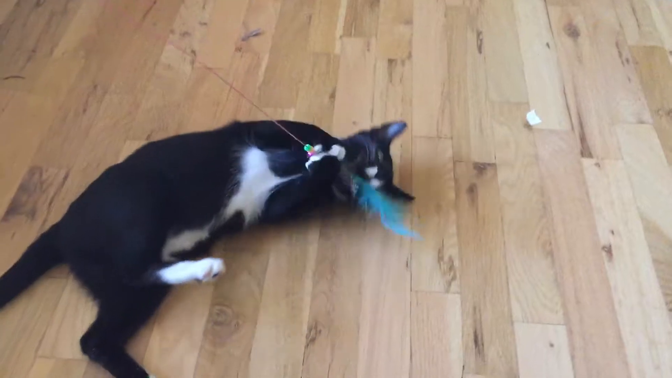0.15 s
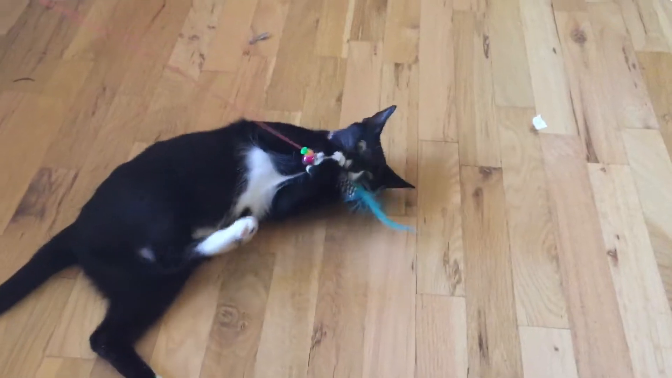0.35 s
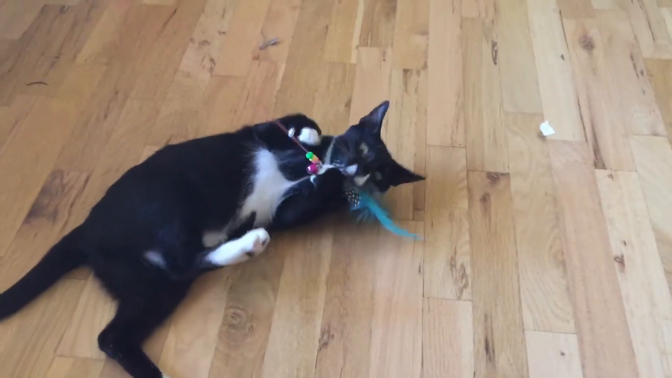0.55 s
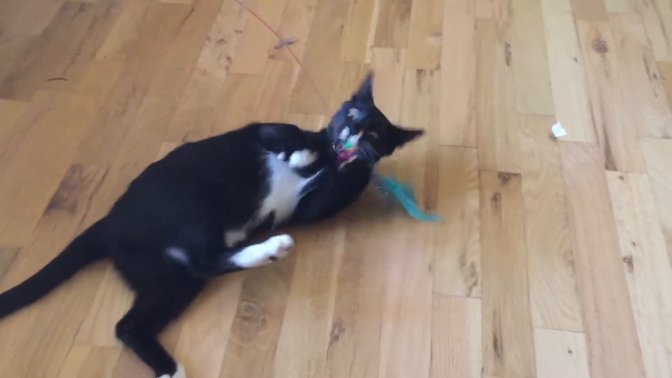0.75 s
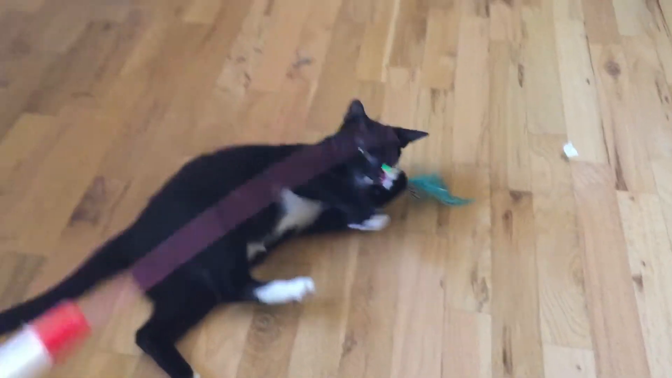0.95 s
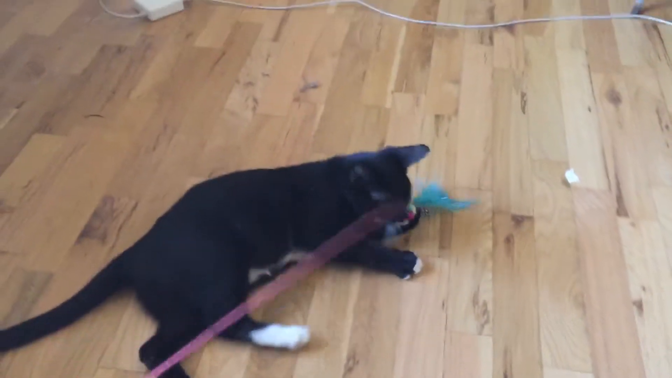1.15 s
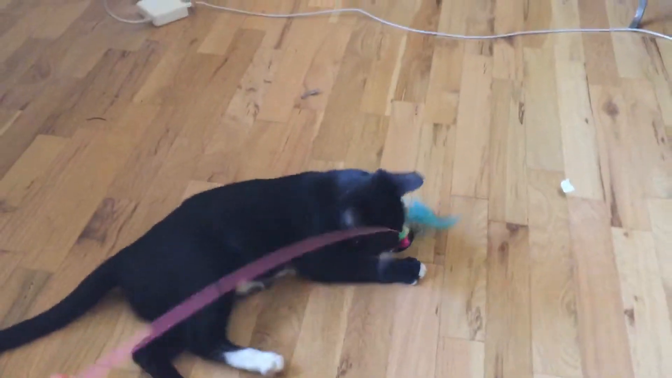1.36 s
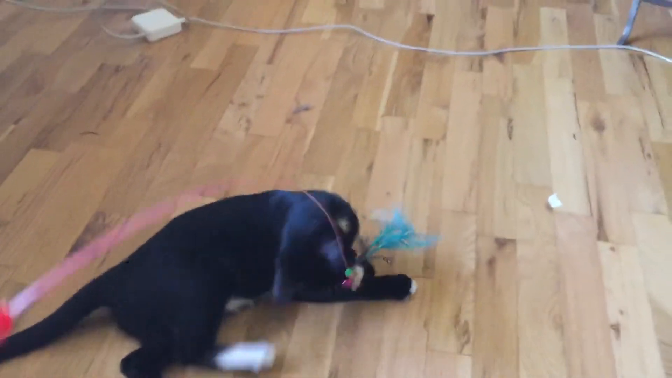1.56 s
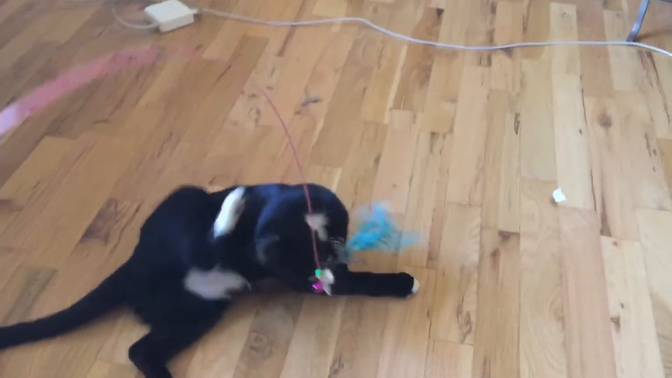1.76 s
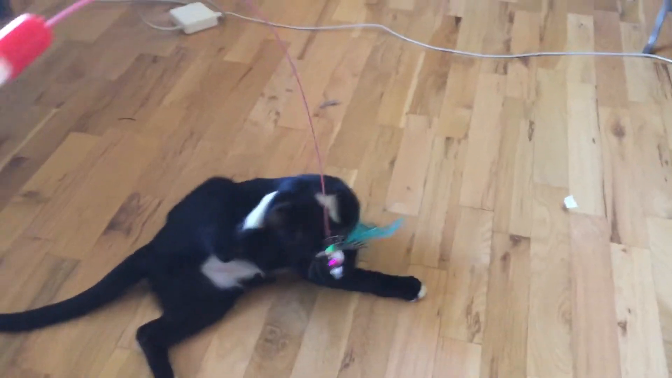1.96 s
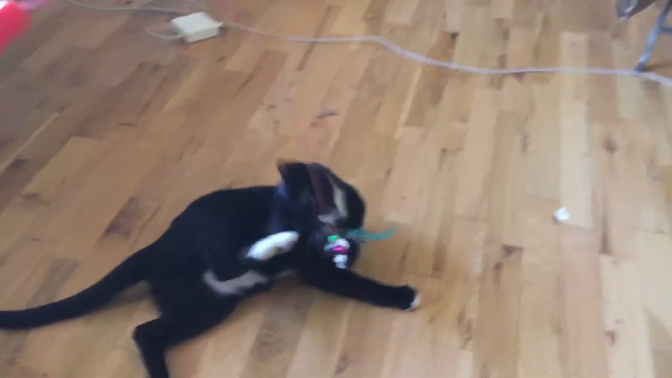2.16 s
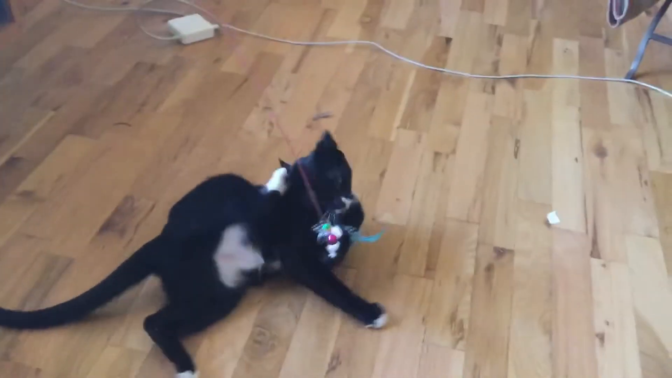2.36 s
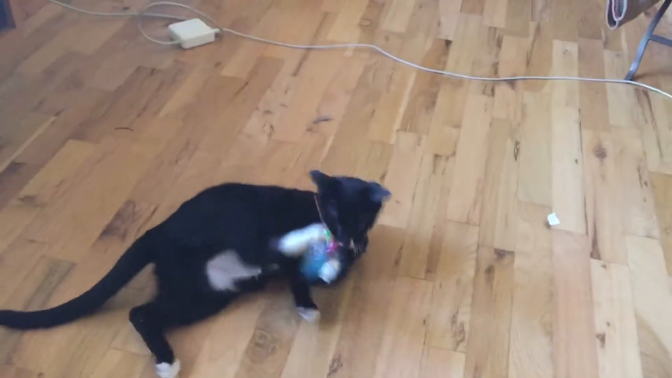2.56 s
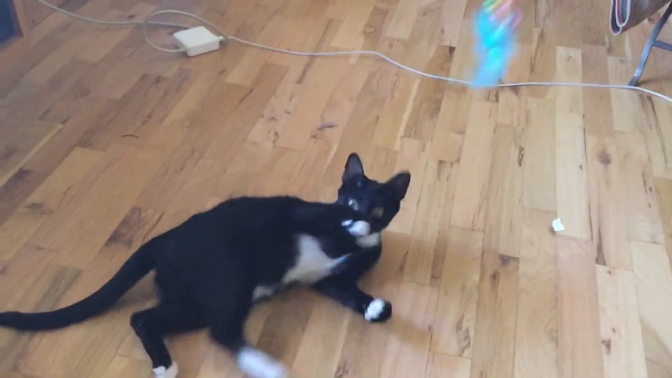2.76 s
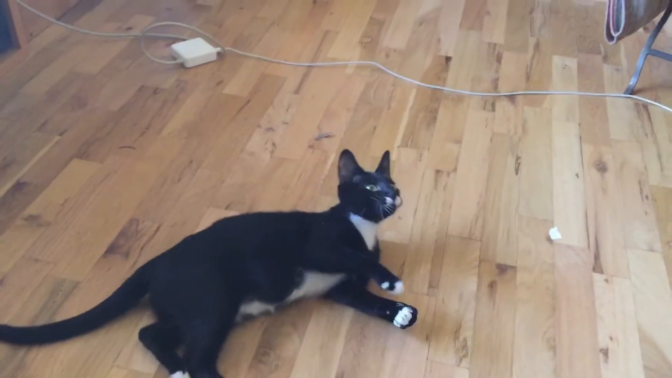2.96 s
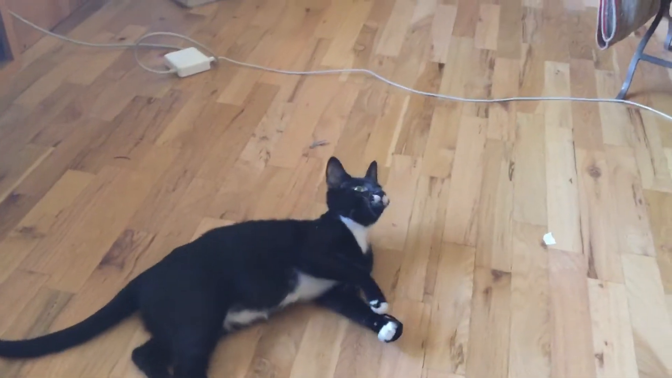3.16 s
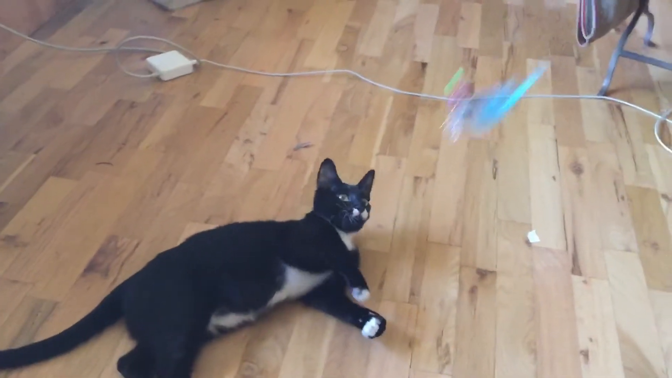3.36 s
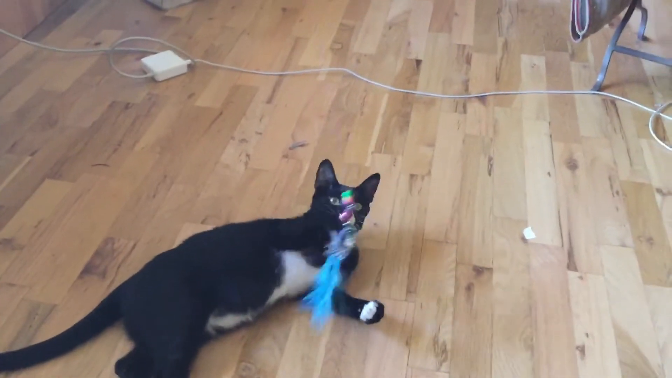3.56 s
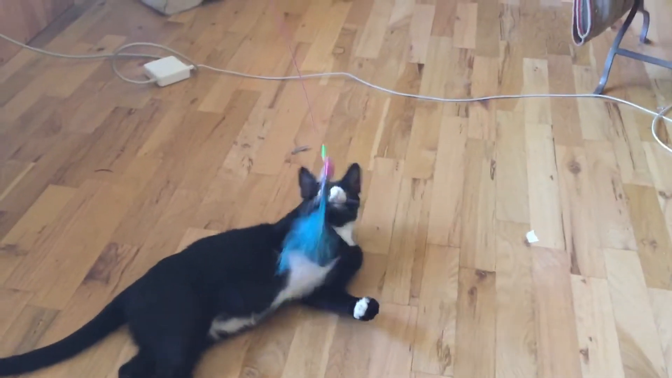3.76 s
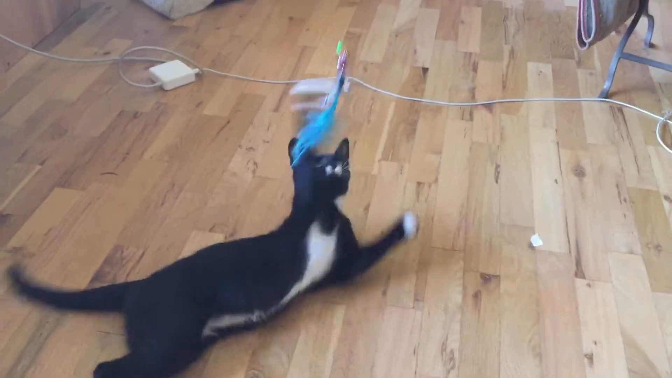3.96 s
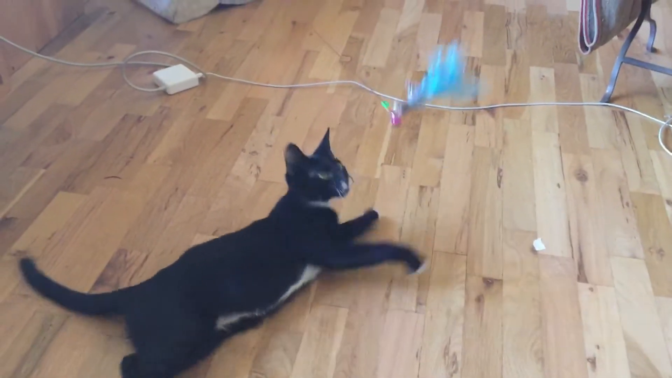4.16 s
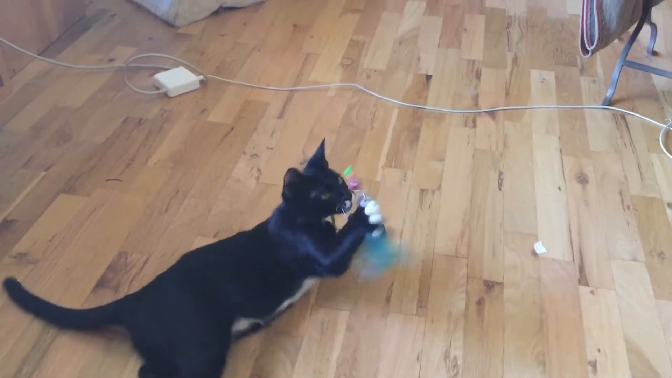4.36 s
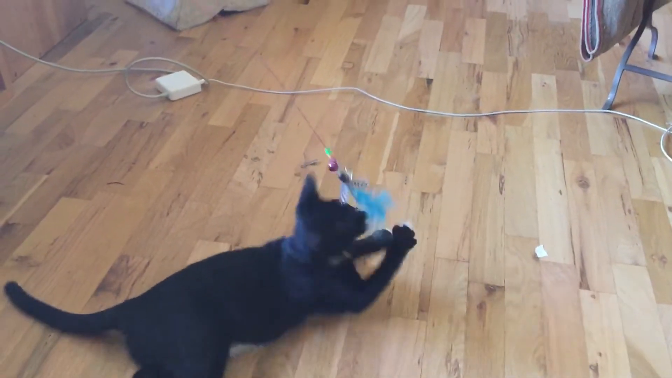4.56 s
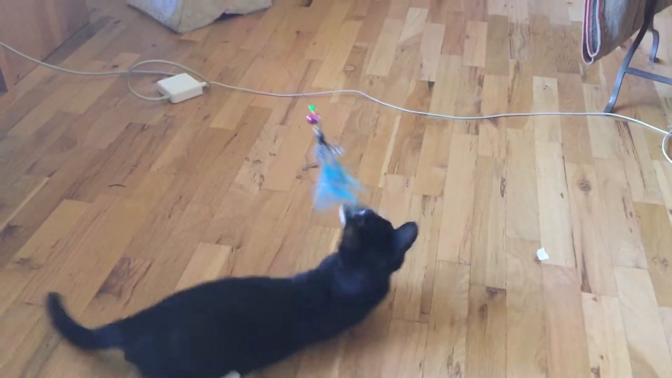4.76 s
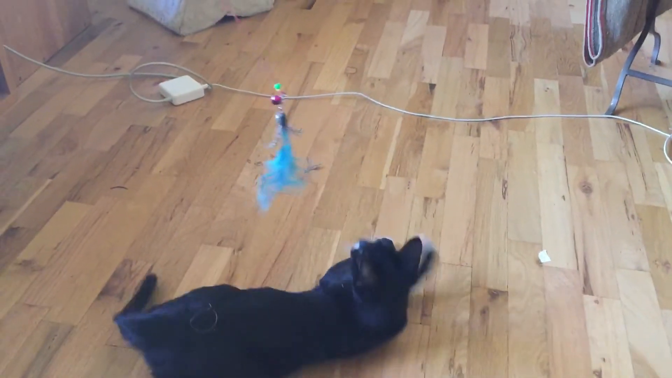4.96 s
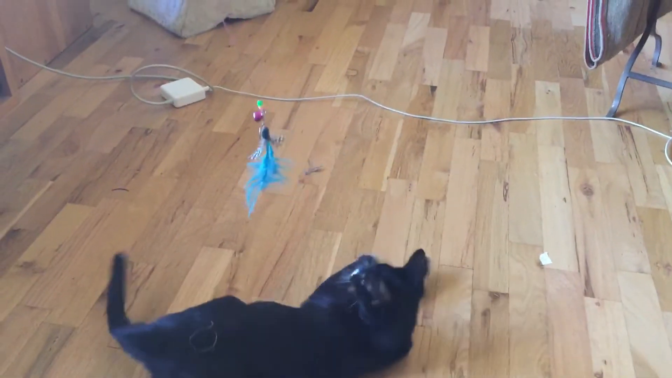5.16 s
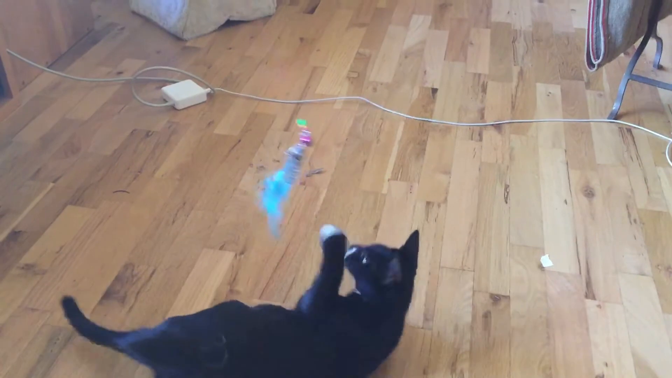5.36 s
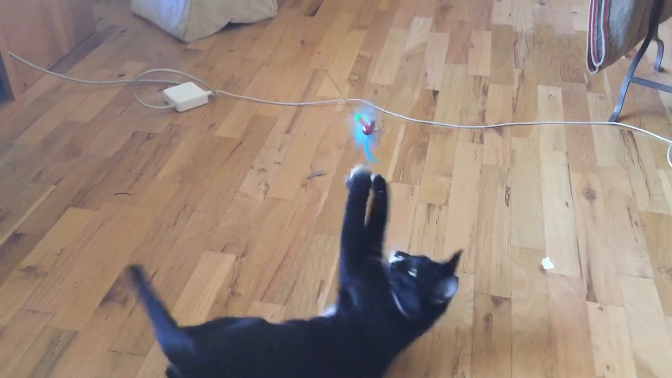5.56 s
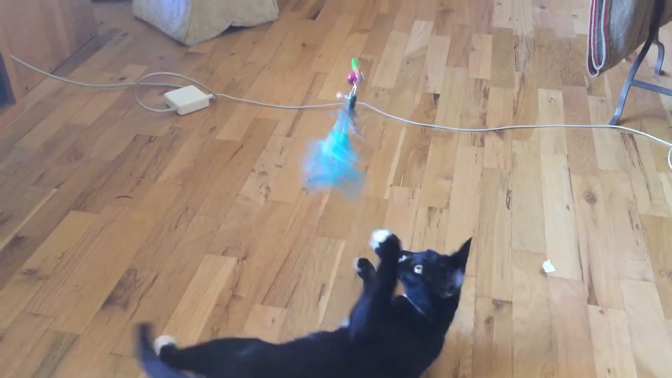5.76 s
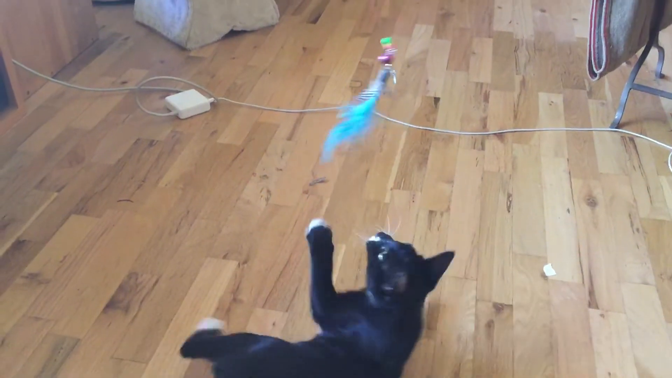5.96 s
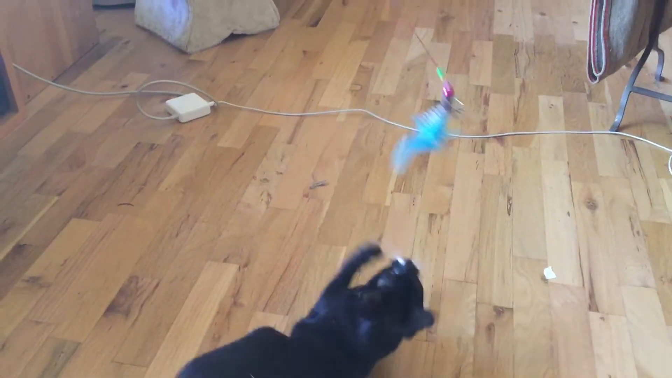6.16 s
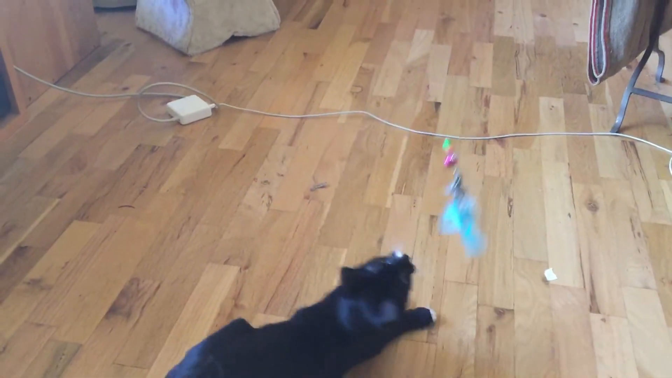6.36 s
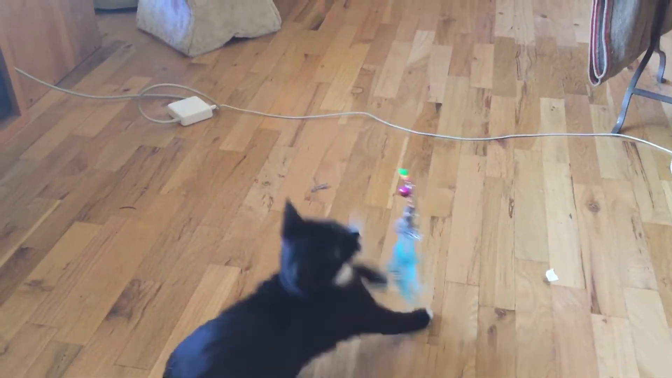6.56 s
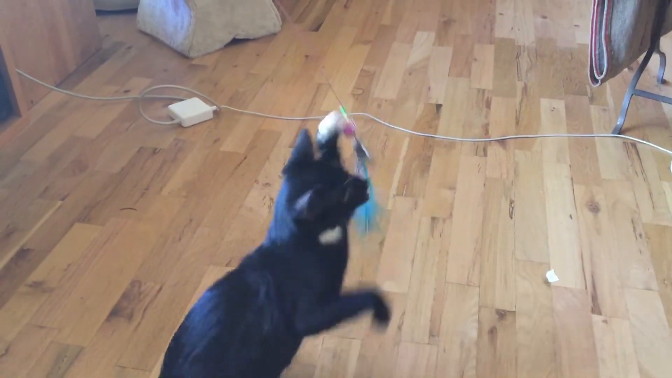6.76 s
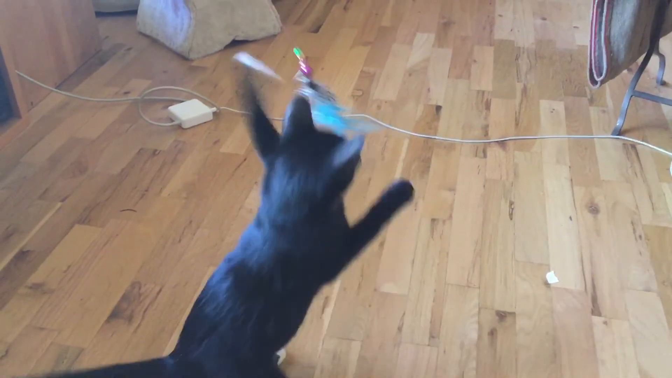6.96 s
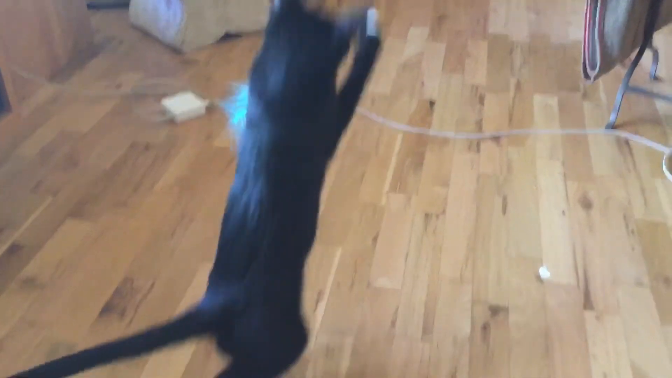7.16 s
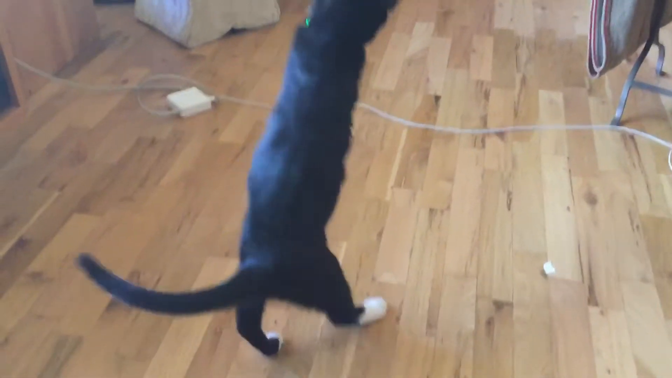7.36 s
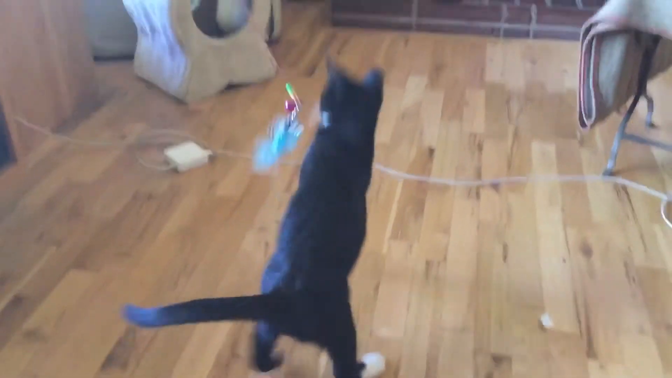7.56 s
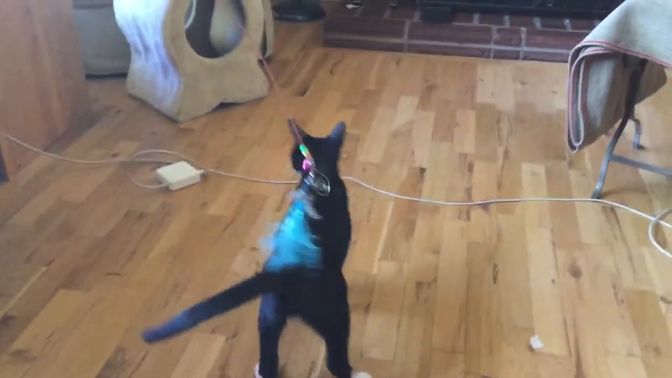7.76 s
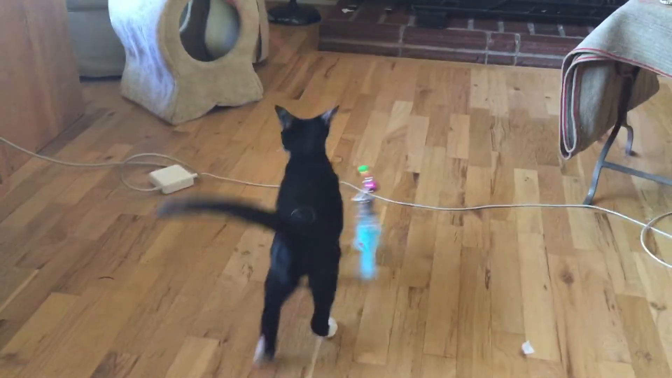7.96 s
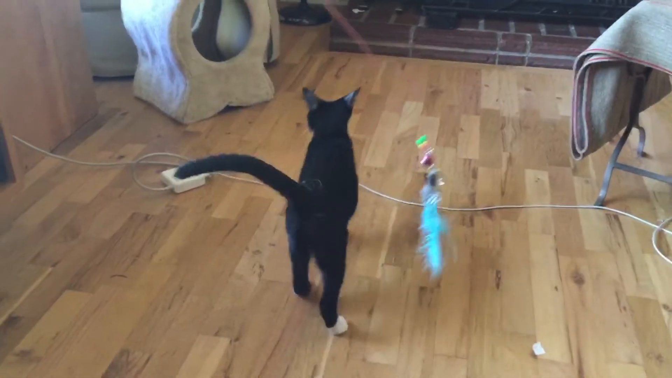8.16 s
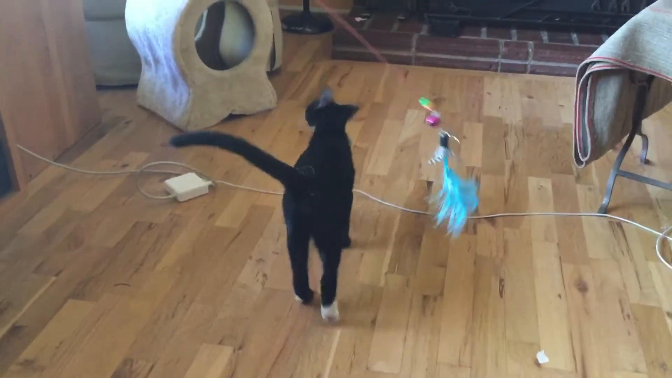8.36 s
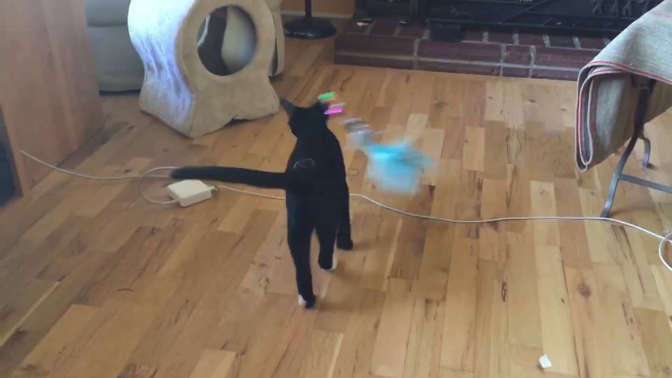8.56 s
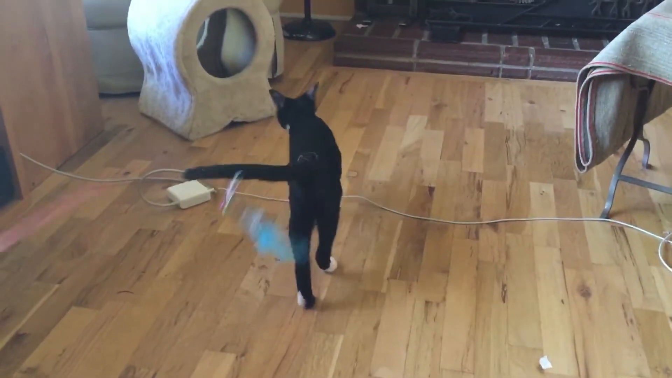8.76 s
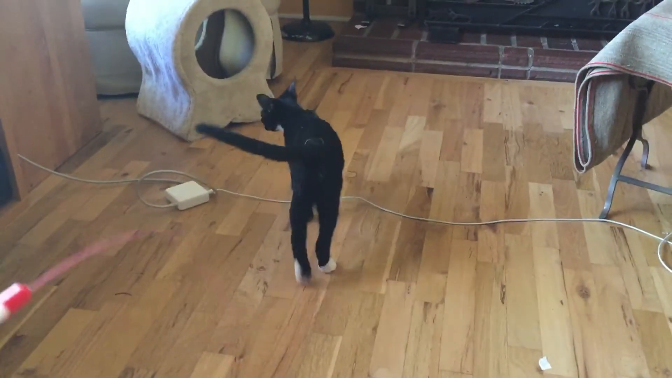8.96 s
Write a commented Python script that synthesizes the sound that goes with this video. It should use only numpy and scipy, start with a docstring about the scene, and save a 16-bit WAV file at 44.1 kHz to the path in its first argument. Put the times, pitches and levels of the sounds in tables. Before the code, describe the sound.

Short, irregular jingles from a very small, bright bell with a loose pellet rattling inside, mixed with crisp bead clicks and dry feathery swishes. The busiest shake comes before three seconds; later bursts are separated by quieter gaps, with soft low thuds and woody knocks as the cat lands on floorboards around the middle and later on. Small live room, close mono pickup, faint bassy background hum-like noise without a clear pitch.

```python
"""A tiny bell jingles over low, steady room noise as a cat plays with a feather toy on a string, on a wooden floor.
The loose pellet rings two shell modes in bursts and skitters along the seam; beads clack as bright noise cracks.
Feathers rustle as streams of tiny cracks. Paws and body ring the board modes; claws and toy knock resonantly.
One faint, hollow blip is a beating pair of tones."""
import sys
import numpy as np
from scipy import signal
from scipy.fft import rfft, irfft
from scipy.io import wavfile

SR = 44100
rng = np.random.default_rng(int(sys.argv[2]) if len(sys.argv) > 2 else 0)


def waveform_to_disk(signal):
    """Save audio, clipped to [-1, 1], as 16-bit WAV at the path in sys.argv[1]."""
    frames = np.transpose(np.atleast_2d(signal))
    scaled = np.clip(frames, -1, 1) * 32767
    samples = np.round(scaled).astype(np.int16)
    wavfile.write(sys.argv[1], SR, samples)


N = 397782
AGE_S = np.arange(SR // 3) / SR   # time since a contact

# Room noise spectrum: (frequency [Hz], relative density [dB])
AMBIENCE_SPECTRUM = [(12, -66.5), (20, -24), (107, -0.5), (216, -8), (277, -8.5), (301, -12.5), (422, -13),
                     (459, -16), (678, -17), (1190, -23), (2200, -25), (4940, -32.5), (16000, -40.5)]
# Claws and toy knock on the wood: (time [s], level before trim [dB], centre [Hz], sharpness [Q])
WOOD_KNOCKS = [(4.122, -54, 550, 2.1), (4.9, -51, 596, 1.2), (5.741, -33.5, 887, 2),
               (5.769, -37, 1350, 1.2), (5.786, -47, 1370, 0.97), (5.824, -48.5, 2630, 12),
               (6.04, -53.5, 2470, 6), (7.68, -48.5, 1170, 0.51), (7.681, -46.5, 2510, 6),
               (7.68, -57, 3500, 3.9), (7.758, -48, 2700, 0.89), (7.869, -58, 2680, 10)]
# Paws and body land on the boards: (time [s], level [dB], hardness corner [Hz])
PAW_LANDINGS = [(1.185, -45.5, 169.1), (4.121, -36, 600), (4.898, -27, 380), (5.741, -30, 499.7),
                (5.769, -29.5, 383), (7.404, -44.5, 450), (7.679, -31.5, 170), (7.944, -44, 108.6),
                (8.094, -41.5, 111.5)]
# Floorboard modes: (frequency [Hz], relative level [dB], T60 [s])
BOARD_MODES = [(63.3, -9, 0.23), (102.3, -5.5, 0.13), (137.4, -11.5, 0.26), (166.4, -7, 0.23),
               (207.7, -12, 0.3), (236, -5, 0.12), (274.5, -4.5, 0.11), (315.7, -15.5, 0.23),
               (362, -12.5, 0.094), (444.6, -21, 0.21)]
# Feathers and string drag over fur and claws:
# (start [s], length [s], hiss level before trim [dB], body level before trim [dB])
FEATHER_DRAGS = [(0.33, 0.048, -56, -69), (.82, 0.14, -53, -74), (1.846, 0.11, -59, -64),
                 (2.681, 0.094, -44, -42.5), (2.853, .23, -42.5, -47), (3.524, 0.031, -55, -51.5),
                 (4.042, 0.14, -52, -58.5), (4.429, 0.046, -48, -52.5), (5.548, 0.047, -50, -48.5),
                 (7.168, 0.18, -55, -64.5), (7.337, 0.096, -50, -57.5)]
# Feather hiss spectrum: (frequency [Hz], relative density [dB])
HISS_SPECTRUM = [(3000, -24), (5500, -6), (7500, 10.5), (10500, -1.5), (16000, -2)]
# Duller toy body, for rustle and clacks: (frequency [Hz], relative density [dB])
BODY_SPECTRUM = [(700, -34), (1400, -10), (2000, -2.5), (2700, 2.5), (6500, -1.5), (10000, -10.5),
                 (16000, -37)]
# Beads and clasp clack together: (time [s], level [dB], body relative to it before trim [dB])
BEAD_CLACKS = [(0.0893, -39, -5.5), (0.2233, -40, -26), (0.3378, -33, -13.5), (0.7398, -39.5, -23),
               (0.8358, -40.5, -8), (1.8707, -31, -14), (1.926, -34, -21), (1.9405, -30, -14),
               (2.5917, -30, -16), (2.6003, -36, -8.5), (2.6334, -26, -6.5), (2.7097, -21, -14),
               (2.826, -34, -5), (2.8883, -26, -9), (2.9119, -24, -8.5), (3.05, -38, -2), (4.0618, -32, -8),
               (4.3325, -38.5, -13), (4.4236, -43, -10), (4.577, -46.5, -2.5), (4.823, -46.5, -6),
               (4.8902, -48.5, -5), (5.552, -35.5, 1), (5.6328, -36, -10), (5.7233, -34, -8),
               (5.8207, -36, -10), (6.034, -47, -3.5), (7.1441, -31.5, -10.5), (7.1915, -31, -9),
               (7.3449, -35.5, -6.5), (7.4197, -39.5, -9)]
# Bright part of a clack: (frequency [Hz], relative density [dB])
CRACK_SPECTRUM = [(3000, -28), (5500, 0.5), (7500, 3.5), (10500, -4.5), (12500, -1), (16000, -9.5)]
# Pellet hits the shell hard: (time [s], level before trim [dB], upper-mode offset [dB],
# skitter relative to level, before trim [dB])
PELLET_STRIKES = [(0.0998, -36.5, -18, -19), (0.3514, -28, -21, -7), (0.384, -32.5, -16.5, -26),
                  (0.5783, -41.5, -31, -26), (0.6295, -43.5, -21, -22), (0.8961, -42, -26, 0),
                  (0.9265, -38, -33, -7), (1.395, -45.5, -25, -7), (1.419, -46, -14, -15),
                  (1.6005, -51, -10, -1), (1.9599, -36.5, -17, -10.5), (2.0523, -35.5, -34, -10),
                  (2.544, -46, -17, -26), (2.6284, -19, -23, -18.5), (2.6947, -27, -14.5, -3),
                  (2.714, -24.5, -14, -23), (2.8514, -25, -26, -6), (2.9317, -31, -23, -11),
                  (3.0625, -28.5, -35, -12), (3.1125, -37, -30, -11), (3.1592, -35.5, -21, -19),
                  (3.25, -41, -30, -2), (4.0997, -32, -13.5, -16), (4.1215, -34.5, -28, -16),
                  (4.201, -37, -31, -23), (4.2737, -34, -40, -29), (4.3311, -39, -24, -9),
                  (4.3668, -34.5, -22, -20), (4.4368, -35.5, -17, -9), (4.5125, -23, -26, -11.5),
                  (4.6268, -41, -20, -31), (4.6953, -42.5, -15.5, -15), (5.5513, -37.5, -14.5, -10.5),
                  (5.6362, -34, -18, -7), (6.0028, -51, -4, -1), (6.1117, -48, -9, -5),
                  (6.3823, -57, -16, -9.5), (7.1772, -38, -7, -1.5), (7.1976, -25.5, -12, -12),
                  (7.3503, -23.5, -20.5, -12), (7.6206, -44, -22, -10), (7.838, -46, -21, -3.5),
                  (8.0092, -42, -8, -1), (8.0456, -43, -33, -10), (8.3517, -51.5, -21, -16.5),
                  (8.872, -33.5, -22, -4.5), (8.9507, -38, -18, -11)]
# Clink of the pellet contact: (frequency [Hz], relative level [dB], T60 [s])
CLINK_MODES = [(5380, -14.5, 0.02), (6260, -15, 0.024), (7230, -29, .025), (8470, -25, 0.027),
               (13500, -33, 0.013)]
# Pellet running along the seam: (frequency [Hz], relative density [dB])
SEAM_SPECTRUM = [(2000, -20.5), (4800, -13), (5300, 3), (7500, -4.5), (8200, 9), (9200, -8), (10500, -18.5),
                 (16000, -16.5)]
# Toy swings after a bat or a tug, pellet tumbles:
# (start [s], length [s], first level before trim [dB], last level before trim [dB])
TOY_SWINGS = [(0.047, 0.45, -41.5, -46.5), (0.659, 0.15, -54, -58), (0.839, 0.25, -41, -62),
              (1.285, 0.6, -58, -63.5), (1.88, 0.25, -43, -49.5), (2.12, 0.37, -63, -70),
              (2.649, 0.54, -36.5, -37), (3.2, 0.26, -45.5, -58), (3.502, 0.51, -53, -73.5),
              (4.063, 0.43, -42, -49), (4.599, 0.59, -48.5, -67.5), (5.572, 0.45, -39, -45),
              (6.031, 0.42, -57.5, -57), (6.698, 0.31, -73.5, -60), (7.201, 0.27, -35.5, -39.5),
              (7.481, 0.58, -47.5, -52.5), (8.196, 0.29, -70, -72), (8.736, 0.28, -56, -45)]

# Shell modes: (frequency [Hz], relative level [dB], T60 [s])
BELL_LOW, BELL_HIGH = (8200, 0, 0.077), (9648, 4.56, 0.1)
AMBIENCE_DB = -61.5
ROOM_T60_S = 0.25
CUTOFF_HZ = 16000
TUMBLES_PER_S, TUMBLE_SPREAD_DB = 20.0, 3.5
TUMBLE_UPPER_DB, UPPER_SPREAD_DB = -18, 8   # upper-mode offset
# skitter before trim at a TYPICAL_DB tumble; dB of skitter per dB of extra force
TYPICAL_DB, SKITTER_DB, SKITTER_DB_PER_DB = -42.0, -48.5, 0.85
# share of tumbles that nudge the beads; level against the tumble; body before trim
TICK_SHARE, TICK_DB, TICK_BODY_DB = 0.3, -2, -12.0


def from_db(db):
    """Decibels to amplitude gain."""
    return 10 ** (np.asarray(db) / 20)


def rms_one(x):
    """Scale to rms 1."""
    return x / np.sqrt(np.mean(x ** 2) + 1e-20)


def fade(t60_s):
    """Exponential decay from contact: -60 dB at t60_s."""
    return np.exp(-np.log(1000) * AGE_S / t60_s)


def onset(rise_s):
    """Exponential approach to full level."""
    return 1 - np.exp(-AGE_S / rise_s)


def ring(hz, t60_s):
    """One struck mode: a decaying sine."""
    return np.sin(2 * np.pi * hz * AGE_S) * fade(t60_s)


def add(out, time_s, sound):
    """Mix a sound in at time_s, cut at the end of out."""
    start = max(round(time_s * SR), 0)
    out[start:start + len(sound)] += sound[:max(len(out) - start, 0)]


def high_pass(x, corner_hz):
    """Fourth-order Butterworth bass cut."""
    return signal.sosfilt(signal.butter(4, corner_hz, "high", fs=SR, output="sos"), x)


def colour(x, spectrum, ripple_db=0, size=4096, count=90):
    """Minimum-phase filter of power gain 1: the given spectrum plus chance resonances."""
    hz, db = np.transpose(spectrum)
    grid_hz = np.linspace(1, SR / 2, size // 2 + 1)
    ripple = np.interp(grid_hz, np.linspace(0, SR / 2, count), rng.standard_normal(count))
    gain = from_db(np.interp(np.log(grid_hz), np.log(hz), db) + ripple_db * ripple)
    # fold the cepstrum to positive time: causal, minimum phase
    cepstrum = irfft(np.log(rms_one(gain)))
    cepstrum[1:size // 2] *= 2
    cepstrum[size // 2 + 1:] = 0
    response = irfft(np.exp(rfft(cepstrum)))
    return signal.fftconvolve(x, response)[:len(x)]


def room(x, wet_db, first_s=0.0018):
    """Direct sound plus decaying noise reflections, drawn anew for each sound."""
    tail = rng.standard_normal(len(AGE_S)) * fade(ROOM_T60_S) * (AGE_S > first_s)
    response = from_db(wet_db) * tail / np.linalg.norm(tail)
    response[0] = 1
    return signal.fftconvolve(x, response)[:len(x)]


def grains(per_s, spread_db, t60_s):
    """Random tiny contacts of uneven size, each a very short noise crack; rms 1."""
    sizes = from_db(spread_db * np.minimum(rng.exponential(1, len(AGE_S)), 3))
    hits = rng.random(len(AGE_S)) < per_s / SR
    energy = signal.fftconvolve(sizes ** 2 * hits, fade(t60_s) ** 2)[:len(AGE_S)]
    return rms_one(np.sqrt(np.abs(energy)) * rng.standard_normal(len(AGE_S)))


def ambience():
    """Steady room noise: coloured Gaussian noise, mostly bass."""
    return from_db(AMBIENCE_DB) * rms_one(colour(rng.standard_normal(N), AMBIENCE_SPECTRUM))


def blip(time_s=2.288, upper_hz=842.0, lower_hz=820.0, tone_db=-47.0, t60_s=0.04, rise_s=0.0041):
    """One faint, hollow blip: two close decaying tones."""
    out = np.zeros(N)
    tones = ring(upper_hz, t60_s) + ring(lower_hz, t60_s)
    add(out, time_s, from_db(tone_db) * tones * onset(rise_s))
    return out


def knocks(trim_db=-2.5, t60_s=0.047, wet_db=-4.5):
    """Hard contacts crack in a resonance of the thing that is hit: noise peaked twice, then faded."""
    out = np.zeros(N)
    for time_s, db, hz, sharpness_q in WOOD_KNOCKS:
        b, a = signal.iirpeak(hz, sharpness_q, fs=SR)
        once = signal.lfilter(b, a, rng.standard_normal(len(AGE_S)))
        wood = rms_one(signal.lfilter(b, a, once)) * fade(t60_s)
        add(out, time_s, from_db(db + trim_db) * room(wood, wet_db))
    return out


def thumps(travel_s=0.0061, pad_s=0.00036, wet_db=-6.5, lowest_hz=52.0):
    """Paws ring the floor, duller on soft landings; slow bending waves bring the boom last."""
    out = np.zeros(N)
    for time_s, db, hard_hz in PAW_LANDINGS:
        floor = np.zeros(len(AGE_S))
        for hz, mode_db, t60_s in BOARD_MODES:
            strength = from_db(mode_db) / np.hypot(1, (hz / hard_hz) ** 2)
            delay_s = travel_s * np.sqrt(BOARD_MODES[-1][0] / hz) - travel_s
            mode = rng.choice([-1, 1]) * ring(hz, t60_s) * onset(pad_s)
            add(floor, delay_s, strength * mode)
        add(out, time_s, from_db(db) * room(floor, wet_db))
    # the floor radiates next to nothing below its lowest mode
    return high_pass(out, lowest_hz)


def rustle(hiss_trim_db=-3.5, body_trim_db=-3.5, per_s=300.0, spread_db=2.0, snap_t60_s=0.011,
           ripple_db=5.5, wet_db=-5.5):
    """Feather barbs and string snap in a stream of tiny cracks that swells and fades with each drag."""
    out = np.zeros(N)
    for start_s, length_s, hiss_db, body_db in FEATHER_DRAGS:
        swell = np.sqrt(np.sin(np.pi * np.minimum(AGE_S / length_s, 1)).clip(0))
        snaps = swell * grains(per_s, spread_db, snap_t60_s)
        flipped = snaps * rng.choice([-1, 1], len(AGE_S))   # decorrelates body from hiss
        hiss = from_db(hiss_db + hiss_trim_db) * colour(snaps, HISS_SPECTRUM, ripple_db)
        body = from_db(body_db + body_trim_db) * colour(flipped, BODY_SPECTRUM, ripple_db)
        padded = np.pad(hiss + body, (0, len(AGE_S)))   # space for the room tail
        add(out, start_s, room(padded, wet_db))
    return out


def clacks(contacts, top_db=-3.5, body_trim_db=-1.0, t60_s=0.029, rise_s=0.0009,
           ripple_db=5.5, wet_db=-3.5):
    """Hard little beads: a bright crack over a duller body, ringing differently each time."""
    out = np.zeros(N)
    for time_s, db, body_db in contacts:
        top, body = fade(t60_s) * onset(rise_s) * rng.standard_normal((2, len(AGE_S)))
        crack = from_db(top_db) * colour(top, CRACK_SPECTRUM, ripple_db)
        crack += from_db(body_trim_db + body_db) * colour(body, BODY_SPECTRUM, ripple_db)
        add(out, time_s, from_db(db) * room(crack, wet_db))
    return out


def ticks(landings):
    """Some jolts that tumble the pellet also tick the beads together; rows like BEAD_CLACKS."""
    nudged = rng.random(len(landings)) < TICK_SHARE
    return [(time_s, db + TICK_DB, TICK_BODY_DB)
            for (time_s, db, _, _), hit in zip(landings, nudged) if hit]


def tumbles():
    """The loose pellet lands unevenly, with a force that follows the swing; rows like PELLET_STRIKES."""
    rows = []
    for start_s, length_s, first_db, last_db in TOY_SWINGS:
        count = max(round(length_s * TUMBLES_PER_S), 1)
        progress = (np.arange(count) + rng.random(count)) / count
        force, spot = rng.standard_normal((count, 2)).clip(-2, 2).T
        db = first_db + (last_db - first_db) * progress + TUMBLE_SPREAD_DB * force
        upper_db = TUMBLE_UPPER_DB + UPPER_SPREAD_DB * spot
        rattle_db = SKITTER_DB + SKITTER_DB_PER_DB * (db - TYPICAL_DB) - db
        rows += zip(start_s + length_s * progress, db, upper_db, rattle_db)
    return rows


def skitter(lead_s, per_s=630.0, spread_db=7.5, t60_s=0.098, run_up_db=-6.5):
    """The pellet runs up the seam of the shell before it strikes, and rattles on afterwards."""
    run_up = from_db(run_up_db) * AGE_S / lead_s
    rattle = from_db(-60 * (AGE_S - lead_s) / t60_s)
    push = np.where(AGE_S < lead_s, run_up, rattle)
    return colour(push * grains(per_s, spread_db, t60_s=0.006), SEAM_SPECTRUM, ripple_db=2.0)


def shell(upper_db, detune_hz=33.9, clink_spread=0.021, contact_s=0.00047):
    """One touch of the pellet: where it lands shifts the modes a little and sets their balance."""
    sound = np.zeros(len(AGE_S))
    for hz, db, t60_s in CLINK_MODES:
        sound += from_db(db) * ring(hz * (1 + rng.normal(0, clink_spread)), t60_s)
    for (hz, mode_db, t60_s), spot_db in ((BELL_LOW, 0), (BELL_HIGH, upper_db)):
        sound += from_db(mode_db + spot_db) * ring(hz + rng.normal(0, detune_hz), t60_s)
    return sound * onset(contact_s)


def bell(strikes, trim_db=1.0, skitter_trim_db=-4.5, lead_s=0.012, wet_db=-7.5, rebound_db=-11.5,
         loss_db=5.5, rebound_s=0.016, lowest_hz=4800.0, count=3):
    """Strikes with uneven, ever weaker rebounds; so small a shell radiates only treble."""
    rings, scrapes = np.zeros(N), np.zeros(N)
    for time_s, db, upper_db, rattle_db in strikes:
        jingle = shell(upper_db)
        delays_s = np.cumsum(rng.uniform(0.2, 1.8, count)) * rebound_s
        for k, delay_s in enumerate(delays_s):
            rebound = shell(upper_db + rng.normal(1.9, 3.3))
            add(jingle, delay_s, from_db(rebound_db - k * loss_db) * rebound)
        add(rings, time_s, from_db(db + trim_db) * room(jingle, wet_db))
        scrape = room(skitter(lead_s), wet_db)
        add(scrapes, time_s - lead_s, from_db(db + rattle_db + skitter_trim_db) * scrape)
    return scrapes + high_pass(rings, lowest_hz)


def scene():
    """Room noise, floor and toy at one microphone."""
    background = ambience() + blip()
    floor = knocks() + thumps()
    landings = tumbles()
    toy = rustle() + clacks(BEAD_CLACKS + ticks(landings)) + bell(PELLET_STRIKES + landings)
    return (background + floor + toy)[None]


def record(dry, low_cut_hz=26.0):
    """The microphone drops the deep bass; the top is cut steeply."""
    thin = high_pass(dry, low_cut_hz)
    return signal.sosfilt(signal.ellip(10, 0.1, 70, CUTOFF_HZ, fs=SR, output="sos"), thin)


dry = scene()
out = record(dry)
waveform_to_disk(out)
```